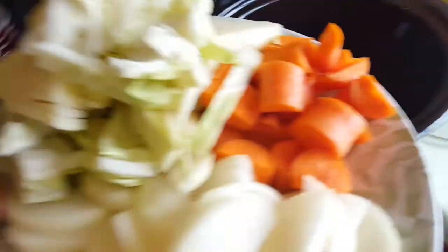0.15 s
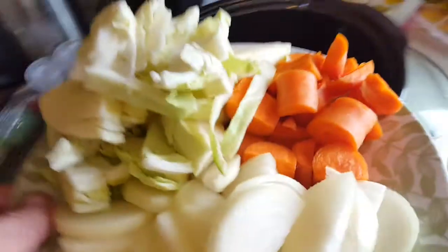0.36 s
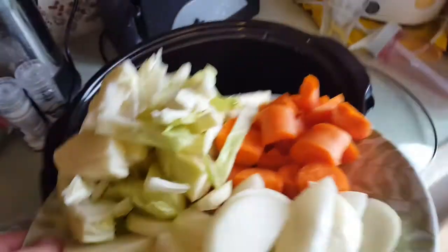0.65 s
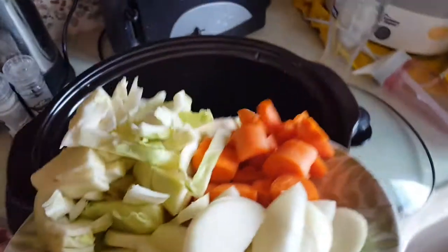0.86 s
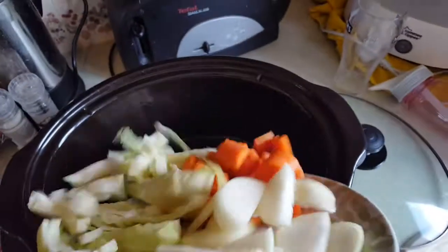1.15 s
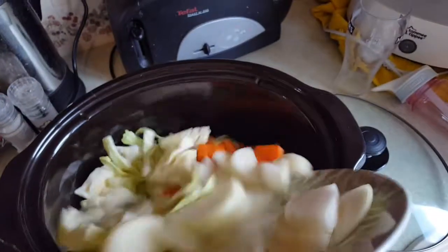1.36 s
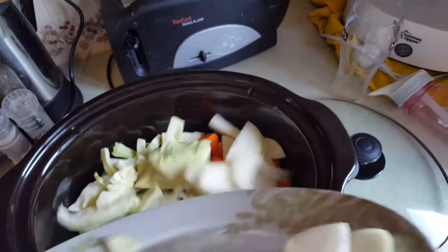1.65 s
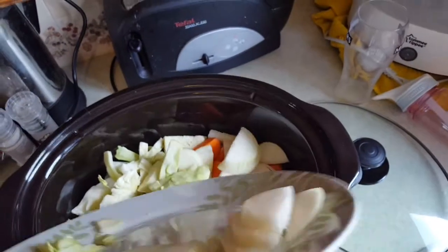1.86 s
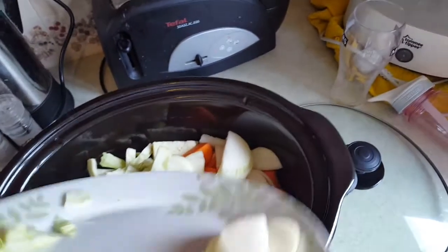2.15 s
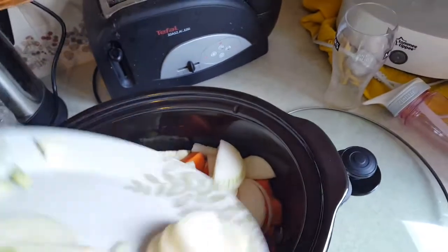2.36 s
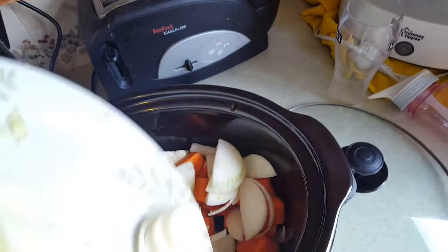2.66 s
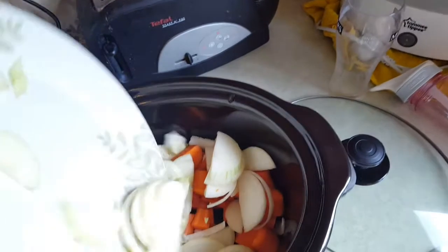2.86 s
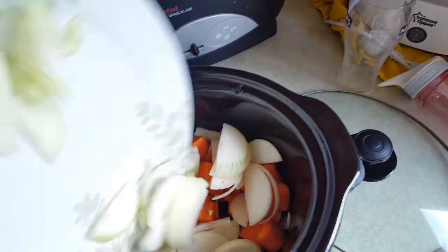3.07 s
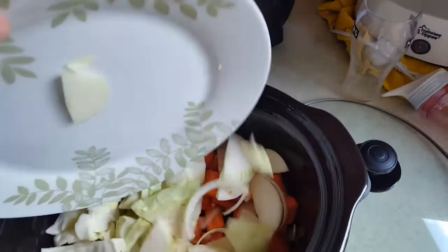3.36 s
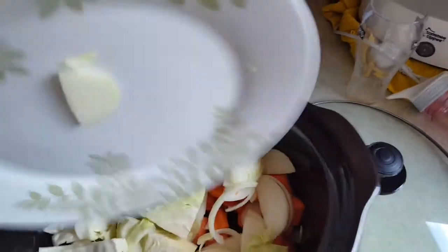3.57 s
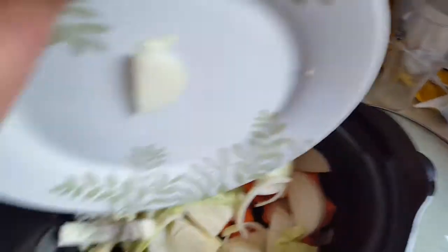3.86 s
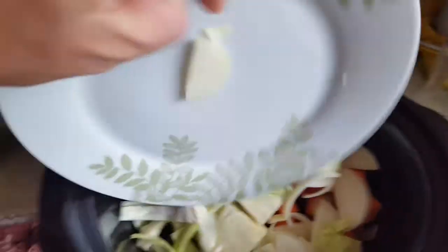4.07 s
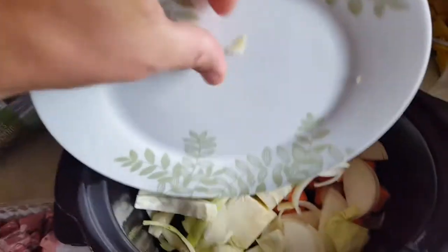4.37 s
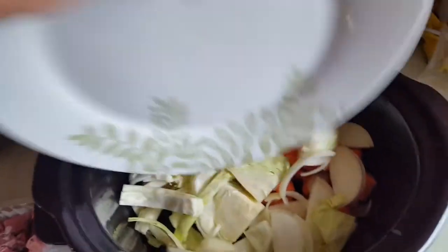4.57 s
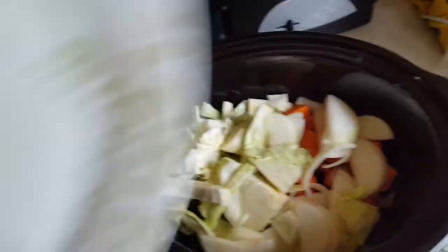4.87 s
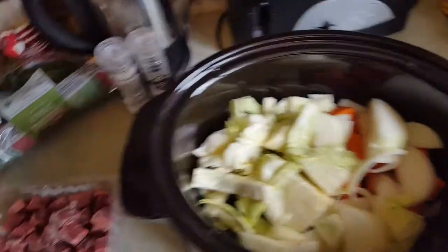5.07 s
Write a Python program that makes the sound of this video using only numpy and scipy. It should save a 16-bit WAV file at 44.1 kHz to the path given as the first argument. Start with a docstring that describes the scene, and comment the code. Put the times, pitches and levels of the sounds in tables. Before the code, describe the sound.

Soft scuffs in a quiet small kitchen, then a china plate clinks on a stoneware pot in an uneven, quick series while chopped vegetables rustle and thump hollowly inside. After a near-silent pause come dull taps and a smaller slide of pieces, light crockery touches, and one hard, ringing plate knock. It ends with faint finger taps, a soft wipe and a tiny squeak. Close stereo microphone, short room reverberation.

```python
"""Vegetables tipped into a stoneware pot

Chopped cabbage, carrot and onion leave a china plate in a small kitchen. The cook shuffles up, the plate
clinks on the pot as pieces tumble in, the rest is pushed off by hand, and the plate knocks once, hard.
Crockery and pot are sums of decaying modes, rubs and taps are shaped noise, sliding pieces are sparse grains.
Noise with a decaying envelope supplies the room; still air and wavering sine tones of an appliance lie below."""
import sys
import numpy as np
from scipy import signal
from scipy.fft import rfft, irfft
from scipy.io import wavfile
from scipy.ndimage import uniform_filter1d

SR = 44100
rng = np.random.default_rng(int(sys.argv[2]) if len(sys.argv) > 2 else 0)


def digitize_waveform(pressure):
    """Quantize a signal to 16-bit integers and store it at the path in sys.argv[1].

    Rows of a 2-D input are taken as channels; values are limited to [-1, 1].
    """
    field = np.atleast_2d(pressure).T
    bounded = np.clip(field, -1, 1)
    quanta = np.round(bounded * 32767).astype(np.int16)
    wavfile.write(sys.argv[1], SR, quanta)


N = 230479
TIME = np.arange(N) / SR   # s
LEFT_RIGHT = np.array([[1], [-1]])   # opposite signs for the two channels
FLAT = [(100, 0), (16000, 0)]   # white spectrum: pitch_hz, level_db


def from_db(db):
    """Logarithmic level: 20 dB is a factor of ten in amplitude."""
    return 10 ** (np.asarray(db) / 20)


def rms_one(x):
    """Power normalisation: scale to a root mean square of one."""
    return x / np.sqrt(np.mean(x ** 2) + 1e-20)


def add(track, s, sound):
    """Superposition: mix a sound into a track from time s on."""
    at = max(round(s * SR), 0)
    track[..., at:at + sound.shape[-1]] += sound[..., :N - at]


def convolve(x, response):
    """Linear system: the output is the input convolved with the impulse response."""
    full = signal.fftconvolve(np.atleast_2d(x), np.atleast_2d(response), axes=-1)
    return full[:, :x.shape[-1]]


def colour(x, spectrum, size=4096):
    """Minimum-phase filtering: a folded cepstrum gives a causal response that follows the spectrum."""
    hz, db = np.transpose(spectrum)
    grid_hz = np.maximum(np.arange(size // 2 + 1) * SR / size, 1)
    log_gain = np.log(from_db(np.interp(np.log(grid_hz), np.log(hz), db)))
    cepstrum = irfft(log_gain)
    cepstrum[1:size // 2] *= 2
    cepstrum[size // 2 + 1:] = 0
    return convolve(x, irfft(np.exp(rfft(cepstrum))))


# stereo width of diffuse sound: pitch_hz [Hz], side_to_mid_db [dB]
DIFFUSE_WIDTH = [(60, -13), (300, -12.5), (700, -2.5), (1300, 2), (16000, -1.5)]


def diffuse(spectrum, size):
    """Diffuse field: noise from all around, alike in both channels in the bass, less so in the treble."""
    mid, side = rng.standard_normal((2, size))
    stereo = mid + colour(side, DIFFUSE_WIDTH) * LEFT_RIGHT
    return rms_one(colour(stereo, spectrum))


def band(x, low_hz, high_hz, order):
    """Band limitation: Butterworth band-pass, scaled to unit power."""
    top_hz = min(max(high_hz, low_hz * 1.1), SR * .45)
    sos = signal.butter(order, [low_hz, top_hz], "band", fs=SR, output="sos")
    return rms_one(signal.sosfilt(sos, x))


def around(x, hz, octaves, order):
    """Constant relative bandwidth: a band-pass some octaves wide around a pitch."""
    return band(x, hz / 2 ** (octaves / 2), hz * 2 ** (octaves / 2), order)


def ring(hz, t60, phase=0):
    """Damped oscillator: one struck mode falls by 60 dB in t60 seconds."""
    t = TIME[:SR // 3]
    return np.sin(2 * np.pi * hz * t + phase) * np.exp(-np.log(1000) * t / t60)


def stroke(rise_s, decay_s):
    """Friction envelope: a rub takes hold linearly, then fades exponentially."""
    t = TIME[:SR // 2]
    return np.minimum(t / rise_s, np.exp((rise_s - t) / decay_s))


def room_decay(build_s=0.0037, hold_s=.04, t60=0.23):
    """Reverberant decay: the reverberation builds up, stays level briefly, then dies away."""
    t = TIME[:SR // 2]
    build = 1 - np.exp(-t / build_s)
    return build * from_db(-60 * (np.hypot(t, hold_s) - hold_s) / t60)


def kitchen(x, wet_db):
    """Room acoustics: direct sound plus the diffuse reverberation of the small room."""
    response = diffuse(FLAT, size=SR // 2) * room_decay()
    unit_energy = response / np.sqrt(np.sum(response ** 2) / 2)
    return x + from_db(wet_db) * convolve(x, unit_energy)


# spectrum of the still air: pitch_hz [Hz], density_db [dB per Hz]
AIR_COLOUR = [(15, -31), (25, -3.5), (55, 3.5), (343, -10), (487, -8.5), (655, -18.5), (1390, -18),
              (1510, -19.5), (15800, -42)]
# tones of the appliance: pitch_hz [Hz], level_db [dB RMS]
HUM_TONES = [(234, -71), (490.5, -73.5), (1175.5, -74.5), (1372, -77)]


def background(air_db=-63.5, waver_hz=1.5):
    """Stationary noise and frequency modulation: still air under an appliance's slightly wavering tones."""
    out = from_db(air_db) * diffuse(AIR_COLOUR, size=N)
    for hz, db in HUM_TONES:
        waver = waver_hz * rms_one(uniform_filter1d(rng.standard_normal(N), size=SR // 10))
        phase = 2 * np.pi * np.cumsum(hz + waver) / SR
        out = out + np.sqrt(2) * from_db(db) * np.sin(phase)
    return out


# rubs of shuffling up and of a hand shifting on the plate: start_s [s], level_db [dB], pitch_hz [Hz], rise_s [s]
SCUFF_EVENTS = [(0, -44.5, 3400, .004), (.068, -38, 2700, .009), (.193, -44, 3500, 0.023),
                (.406, -42, 2300, 0.0046), (.636, -44, 3800, 0.0044), (.690, -47.5, 4600, 0.0086),
                (1.043, -51.5, 4200, .014), (3.842, -49, 2200, .012)]
# level of a soft, broad rustle that rises and sinks: time_s [s], level_db [dB]
SOFT_RUSTLE_LEVEL = [(0, -55.5), (.45, -53), (.6, -62), (2.6, -66), (3.1, -59.5), (4.4, -66.5),
                     (4.87, -74.5), (5.23, -67.5)]
# spectrum of the soft rustle, and of rubs before their band-pass: pitch_hz [Hz], density_db [dB per Hz]
SOFT_RUSTLE_COLOUR = [(100, 2.5), (250, 6.5), (700, 0), (1500, -6), (3000, -4), (8000, -9.5),
                      (10000, -19.5), (16000, -17.5)]


def scuffs(width_octaves=2.3, decay_s=.046):
    """Friction noise: brief rubs swell and fade over a soft, broad rustle that rises and sinks."""
    out = np.zeros((2, N))
    for s, db, hz, rise_s in SCUFF_EVENTS:
        rub = around(diffuse(SOFT_RUSTLE_COLOUR, size=SR // 2), hz, width_octaves, order=1)
        add(out, s, from_db(db) * rub * stroke(rise_s, decay_s))
    soft_rustle_db = np.interp(TIME, *np.transpose(SOFT_RUSTLE_LEVEL))
    return out + from_db(soft_rustle_db) * diffuse(SOFT_RUSTLE_COLOUR, size=N)


# taps of stray pieces and fingers, dull bumps of the pot:
# start_s [s], level_db [dB], pitch_hz [Hz], width_octaves [octaves]
TAP_EVENTS = [(0.13, -40, 169, 0.64), (2.718, -53.5, 774, 1.8), (2.918, -44.5, 800, 2.1),
              (2.967, -27.5, 374, 2.47), (2.969, -36.5, 1800, 1.06), (2.979, -37, 84, 1.02),
              (3.244, -33.5, 2760, 1.46), (3.344, -37, 390, 3.4), (3.3725, -29.5, 2070, 3.2),
              (3.5748, -45, 5600, 0.71), (3.835, -36, 1630, 3.14), (4.173, -50, 180, 1.3),
              (4.435, -45.5, 1100, 2.8), (4.475, -43.5, 1290, 3.1), (4.501, -46.5, 1080, 2.3)]


def taps(decay_at_1khz_s=.005, decay_slope=.66):
    """Heavily damped impact: short noise bursts, longer the lower their pitch."""
    out, t = np.zeros((2, N)), TIME[:SR // 7]
    for s, db, hz, octaves in TAP_EVENTS:
        contact = around(diffuse(FLAT, size=len(t)), hz, octaves, order=2)
        fade = np.exp(-t / (decay_at_1khz_s * (1000 / hz) ** decay_slope))
        # fixes the energy of the faded burst
        add(out, s, from_db(db) * rms_one(contact * fade) * np.sqrt(np.mean(fade ** 2)))
    return out


# the plate's rim touches the pot:
# start_s [s], level_db [dB], contact_hz (brightness) [Hz], rebound (relative strength) [0-1]
CLINK_EVENTS = [(1.1605, -11.5, 5015, 0), (1.2505, -23, 3400, 0.73), (1.302, -28, 2000, 0),
                (1.344, -18.5, 2900, 0.6), (1.397, -19, 2410, .95), (1.445, -8.5, 2460, 0.2),
                (1.4822, -8.5, 1640, 0.2), (1.488, -10, 2120, 0.5), (1.740, -7.5, 950, 0.38),
                (1.806, -23, 880, 0.3)]
# modes of a clink: pitch_hz [Hz], level_db [dB], t60_s before contact damping [s], left_to_right_db [dB]
CLINK_MODES = [(423.2, -22, 0.24, -0.5), (1197, 2, 0.091, 6.5), (1200, 1, 0.019, 5),
               (1259.5, -6, 0.12, -1.5), (1694, -23.5, .08, -3), (2041, 2, 0.16, -.5),
               (2042.6, 4.5, 0.22, -1.5), (2359, -17.5, 0.29, -6), (3060, -9.5, 0.16, -1),
               (3190, -19.5, 0.17, -10.5), (3353, -8.5, 0.1397, 1.5), (3610, -17, 0.15, 1),
               (3960, -14, 0.17, 3), (4485, -22.5, 0.27, -7), (5170, -26.5, .08, -3.5),
               (5600, -30, 0.34, -17.5), (6700, -18.5, 0.094, -14.5), (8000, -14.5, .1, 0.5)]
# contacts duller than DAMPING_HZ linger and cut the ring short; so do pieces lying in the pot
REBOUND_S, DAMPING_HZ, FILLED_RING_SHARE = 0.014, 1405, 0.83
SHOWER_START_S = 1.275   # the bulk begins to land


def clinks(spread_db=1.54, tick_db=-23, tick_s=0.0014, lead_s=.00008, steepness=3.2):
    """Modal excitation: a soft contact of china on stoneware leaves high modes out and damps the rest."""
    out, t = np.zeros((2, N)), TIME[:SR // 10]
    regions_hz = np.arange(0, 9000, 500)
    for s, db, contact_hz, rebound in CLINK_EVENTS:
        clink = np.zeros((2, SR // 3))
        ring_share = contact_hz / np.hypot(contact_hz, DAMPING_HZ)
        if s > SHOWER_START_S:
            ring_share *= FILLED_RING_SHARE
        # each point of the rim favours other modes; close pairs are woken alike
        favour_db = spread_db * rng.standard_normal(len(regions_hz))
        for k, (hz, mode_db, t60, pan_db) in enumerate(CLINK_MODES):
            softness = 1 + (hz / contact_hz) ** steepness
            strength = from_db(mode_db + np.interp(hz, regions_hz, favour_db)) / softness
            # neighbouring modes swing in opposite phase, so a close pair swells before it fades
            swing = (-1) ** k * ring(hz, t60 * ring_share, LEFT_RIGHT * np.pi * hz * lead_s)
            clink += strength * from_db(LEFT_RIGHT * pan_db / 2) * swing
        tick = band(rng.standard_normal((2, len(t))), 750, contact_hz, order=2)
        add(clink, 0, from_db(tick_db) * tick * np.exp(-t / tick_s))
        add(out, s, from_db(db) * clink)
        add(out, s + REBOUND_S, from_db(db) * rebound * clink)
    return out


SHOWER_END_S, SHOWER_DB, LANDINGS_PER_S = 1.84, -27, 34
HEAP_S, CUSHION_DB_PER_S = 1.46, 33   # from HEAP_S on, the heap softens the landings


def shower(spread_db=2.5, count=60):
    """Jittered point process: pieces land in uneven succession, more softly once a heap cushions them."""
    slots = np.arange(count) + rng.random(count)
    s = SHOWER_START_S + slots / LANDINGS_PER_S
    cushion_db = CUSHION_DB_PER_S * np.maximum(s - HEAP_S, 0)
    db = SHOWER_DB - cushion_db + spread_db * rng.standard_normal(count)
    return list(np.column_stack([s, db])[s < SHOWER_END_S])


# single landings placed by hand, loud to faint: start_s [s], level_db [dB]
SINGLE_LANDINGS = [(1.251, -25), (1.264, -26), (1.329, -24), (1.602, -32.5), (1.925, -38.5), (2.036, -55),
                   (4.570, -48.5)]
# resonances of the hollow of the pot: pitch_hz [Hz], level_db [dB], t60_s [s]
HOLLOW_MODES = [(225, -10, 0.63), (277, -21, .07), (397, -10.5, 0.23), (414.7, -1, 0.14), (453, -15, 0.075),
                (507.4, -17, 0.27)]


def thumps(spread_db=2.5, boom_db=-2.0, slap_db=-6.0, slap_s=0.0095, slap_low_hz=190, slap_high_hz=650):
    """Cavity resonance: each landing is a dull slap that sets the hollow of the pot booming."""
    out, t = np.zeros(N), TIME[:SR // 10]
    for s, db in SINGLE_LANDINGS + shower():
        slap = band(rng.standard_normal(len(t)), slap_low_hz, slap_high_hz, order=2)
        add(out, s, from_db(db + slap_db) * slap * np.exp(-t / slap_s))
        for hz, mode_db, t60 in HOLLOW_MODES:
            boom_level_db = db + boom_db + mode_db + spread_db * rng.standard_normal()
            add(out, s, from_db(boom_level_db) * ring(hz, t60))
    return out


# batches of sliding pieces: peak_s [s], flow_db (before the gains of rustle and snaps) [dB],
# swell_s (time constant) [s], run_out_s (time constant) [s]
POUR_BATCHES = [(1.266, -29.5, 0.011, 0.0061), (1.361, -36.5, 0.081, .185), (1.687, -40.5, 0.019, .007),
                (3.373, -48, 0.067, 0.015), (3.452, -53, 0.0036, 0.034)]


def flow():
    """Power addition of envelopes: every sliding batch gathers speed, then runs out."""
    power = 0
    for s, db, swell_s, run_out_s in POUR_BATCHES:
        swell = np.exp(np.minimum((TIME - s) / swell_s, (s - TIME) / run_out_s))
        power = power + (from_db(db) * swell) ** 2
    return np.sqrt(power)


# spectrum of crisp pieces sliding: pitch_hz [Hz], density_db [dB per Hz]
RUSTLE_COLOUR = [(30, -28), (110, -6), (200, -2), (400, 0), (750, -5), (1100, -3.5), (1800, -7),
                 (3000, -7.5), (6000, -10), (8000, -15.5), (10000, -27.5), (16000, -27)]


def rustle(per_s=1700, size_db=1.5, pan_db=4.0, gain_db=3.0, clump_db=5.0):
    """Granular noise: crisp cut edges tick against plate, pot and each other in clumps of tiny contacts."""
    sizes = from_db(size_db * np.minimum(rng.exponential(1, N), 4)) * rng.choice([-1, 1], N)
    drift = rms_one(uniform_filter1d(rng.standard_normal(N), size=SR // 120))
    clumps = from_db(clump_db * np.tanh(drift))
    contacts = rng.random(N) < per_s / SR
    pan = from_db(pan_db * rng.standard_normal(N) * LEFT_RIGHT)
    grains = clumps * sizes * contacts * pan
    return from_db(gain_db) * flow() * rms_one(colour(grains, RUSTLE_COLOUR))


def snaps(per_s=70, gain_db=6.0, size_db=4.0, low_hz=700, high_hz=6000, octaves=.6, decay_s=.003, count=10):
    """Sparse impulse excitation: firm pieces flick out of the rustle, each in one of ten pitch bands."""
    t, dealt = TIME[:SR // 40], rng.integers(0, count, N)
    sizes = from_db(gain_db + size_db * np.minimum(rng.standard_normal(N), 2))
    flicks = flow() * sizes * (rng.random(N) < per_s / SR)
    out = np.zeros((2, N))
    for k, hz in enumerate(np.geomspace(low_hz, high_hz, count)):
        snap = around(rng.standard_normal((2, len(t))), hz, octaves, order=2) * np.exp(-t / decay_s)
        out += convolve(flicks * (dealt == k), snap)
    return out


# light touches of the crockery: start_s [s], level_db [dB]
TOUCH_EVENTS = [(3.714, -57), (3.778, -48), (3.856, -45), (4.502, -55.5)]
# modes of the crockery, free in the knock, damped in a touch: pitch_hz [Hz], level_db [dB], t60_s (free) [s]
KNOCK_MODES = [(218, -8.5, 0.3), (649, -9, 0.19), (940, -12.5, 0.33), (1466, -3.5, 0.3), (1518, -5.5, 0.21),
               (1576, -6.5, 0.13), (2027, -9, 0.2), (2458, -7.5, .21), (2700, -5, 0.26), (3510, -7.5, 0.13),
               (3933, 1.5, 0.14), (4420, -18, 0.12), (4760, -10, .17), (5200, -9.5, 0.16),
               (5400, -12, 0.16), (5830, -13, .2), (6280, -17, 0.17), (6950, -20.5, 0.15),
               (7740, -24.5, 0.23), (9630, -32, 0.14), (12800, -26, 0.19), (15430, -21, .17)]


def touches(ring_share=0.27, low_edge_hz=1300):
    """Selective excitation: a grazing touch favours the upper modes, and the hand soon damps them."""
    out, tink = np.zeros(N), 0
    for hz, db, t60 in KNOCK_MODES:
        strength = from_db(db) / (1 + (low_edge_hz / hz) ** 2)
        tink = tink + strength * ring(hz, t60 * ring_share, rng.uniform(-np.pi, np.pi))
    for s, db in TOUCH_EVENTS:
        add(out, s, from_db(db) * tink)
    return out


# spectrum of the crack and of the kitchen's answer: pitch_hz [Hz], density_db [dB per Hz]
KNOCK_COLOUR = [(25, -36), (90, -17), (180, -15), (260, -8), (400, -1.5), (700, -8.5), (1200, -8.5),
                (2100, -16.5), (2600, -7.5), (3200, -20), (3800, -15.5), (6200, -24.5), (9000, -40),
                (16000, -45)]
KNOCK_S, CRACK_DB, CRACK_LENGTH_S = 4.196, -1.5, 0.0052
KNOCK_RING_DB, KNOCK_RING_ROOM_DB, KNOCK_WASH_DB = -14, -14.5, -11.5


def knock(crack_low_hz=700, crack_high_hz=6000, build_s=0.02, hold_s=0.052, t60=0.19, lead_s=.0001):
    """Impact, modal ring and reverberation: a hard crack, ringing crockery, the kitchen answering."""
    body, out, t = np.zeros((2, N)), np.zeros((2, N)), TIME[:SR // 2]
    for hz, db, mode_t60 in KNOCK_MODES:
        # each mode starts at its own point of the swing, a little ahead on the left
        lead = LEFT_RIGHT * min(np.pi * hz * lead_s, np.pi / 5)
        phase = rng.uniform(-np.pi, np.pi) + lead
        add(body, KNOCK_S, from_db(KNOCK_RING_DB + db) * ring(hz, mode_t60, phase))
    crack = band(diffuse(KNOCK_COLOUR, size=len(t)), crack_low_hz, crack_high_hz, order=1)
    half_swing = np.sin(np.pi * np.minimum(t / CRACK_LENGTH_S, 1))
    contact = np.sqrt(np.maximum(half_swing, 0))
    add(out, KNOCK_S, from_db(CRACK_DB) * rms_one(crack * contact) * np.sqrt(np.mean(contact ** 2)))
    wash = diffuse(KNOCK_COLOUR, size=len(t)) * room_decay(build_s, hold_s, t60)
    add(out, KNOCK_S, from_db(KNOCK_WASH_DB) * wash)
    return out + kitchen(body, wet_db=KNOCK_RING_ROOM_DB)


WIPE_S, WIPE_DB, WIPE_RISE_S, WIPE_DECAY_S = 4.481, -61, 0.17, .13
SQUEAK_S, SQUEAK_DB, SQUEAK_HZ, SQUEAK_LENGTH_S = 4.826, -55, 1150, 0.0098


def wipe(low_hz=1900, high_hz=2900):
    """Sliding friction: fingers wipe the last piece off the glaze as noise, then squeak as a brief tone."""
    out = np.zeros((2, N))
    rub = band(diffuse(SOFT_RUSTLE_COLOUR, size=SR // 2), low_hz, high_hz, order=1)
    add(out, WIPE_S, from_db(WIPE_DB) * rub * stroke(WIPE_RISE_S, WIPE_DECAY_S))
    swell = np.exp(-((TIME - SQUEAK_S) / SQUEAK_LENGTH_S) ** 2)
    return out + from_db(SQUEAK_DB) * np.sin(2 * np.pi * SQUEAK_HZ * TIME) * swell


def scene(bass_edge_hz=75):
    """Superposition of sources: everything at the worktop, most of it with its own share of room."""
    rim = kitchen(clinks(), wet_db=-13)
    pour = rim + kitchen(thumps(), wet_db=-6) + kitchen(rustle() + snaps(), wet_db=-3.5)
    # keep the deep bass out of pour and knock
    high_pass = signal.butter(2, bass_edge_hz, "high", fs=SR, output="sos")
    pour_and_knock = signal.sosfilt(high_pass, pour + knock())
    small_contacts = kitchen(taps() + touches(), wet_db=-7)
    return pour_and_knock + small_contacts + scuffs() + wipe() + background()


# unlike colour of the two microphones: pitch_hz [Hz], left_to_right_db [dB]
MIC_BALANCE = [(60, 1), (200, 4), (700, 1.5), (2400, 3), (4400, -1.5), (8000, -4), (14000, 2.5)]
CUTOFF_HZ = 15900


def record(dry):
    """Transduction: two microphones of unlike colour, soft saturation of peaks, a steep low-pass."""
    ears = []
    for x, side in zip(dry, (1, -1)):
        ears.append(colour(x, [(hz, side * db / 2) for hz, db in MIC_BALANCE]))
    ears = np.vstack(ears)
    rounded = ears / (1 + ears ** 4) ** .25
    low_pass = signal.ellip(10, .1, 80, CUTOFF_HZ, fs=SR, output="sos")
    return signal.sosfilt(low_pass, rounded)


dry = scene()
out = record(dry)
digitize_waveform(out)
```